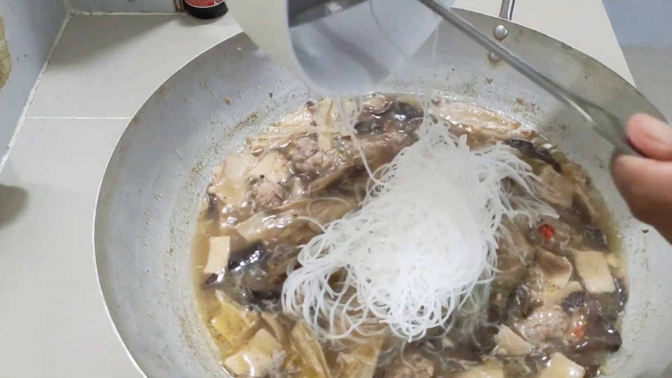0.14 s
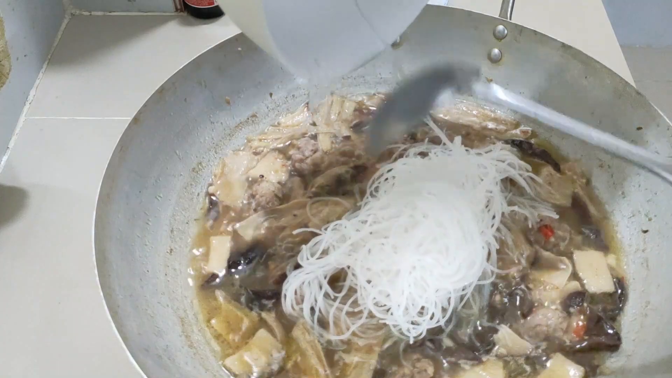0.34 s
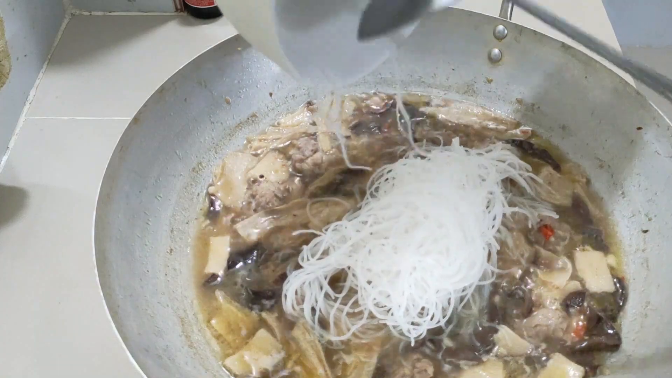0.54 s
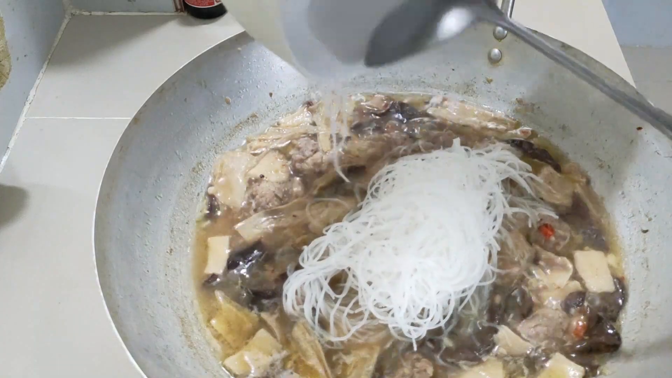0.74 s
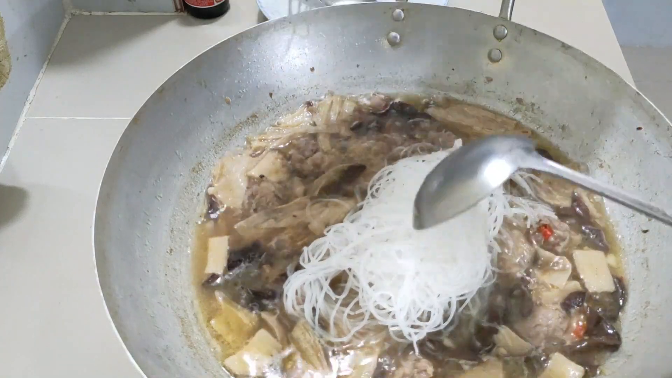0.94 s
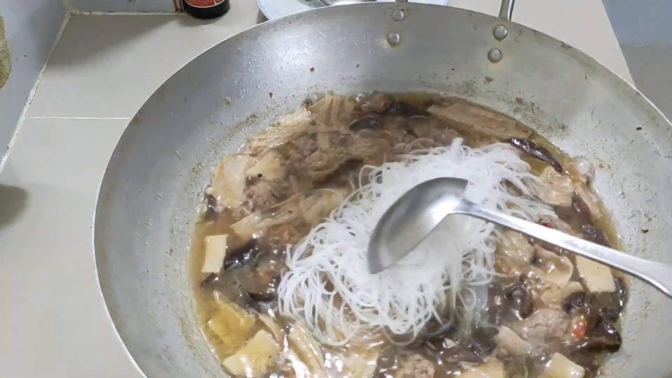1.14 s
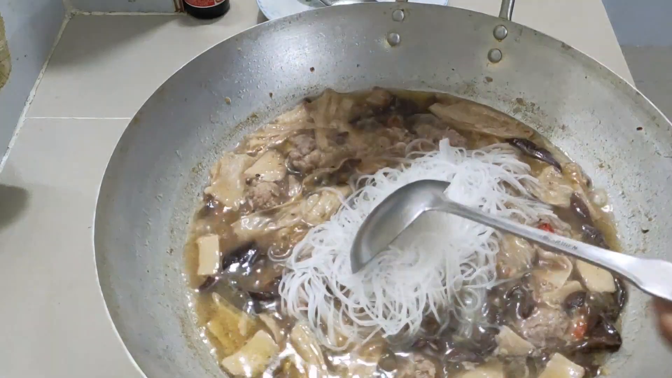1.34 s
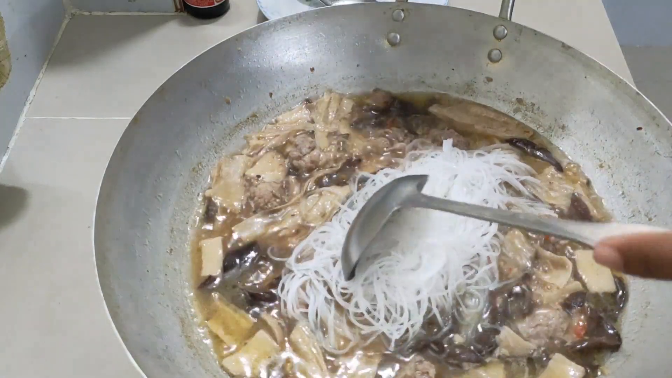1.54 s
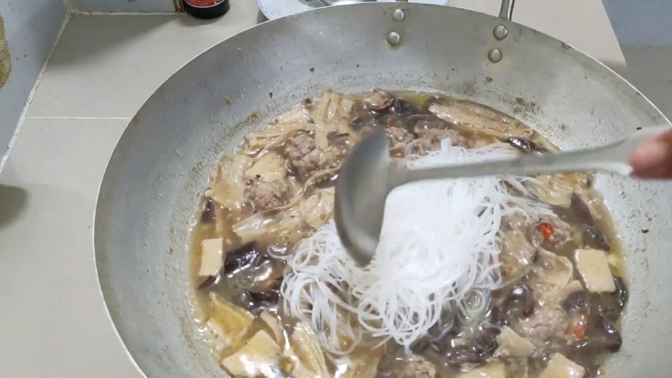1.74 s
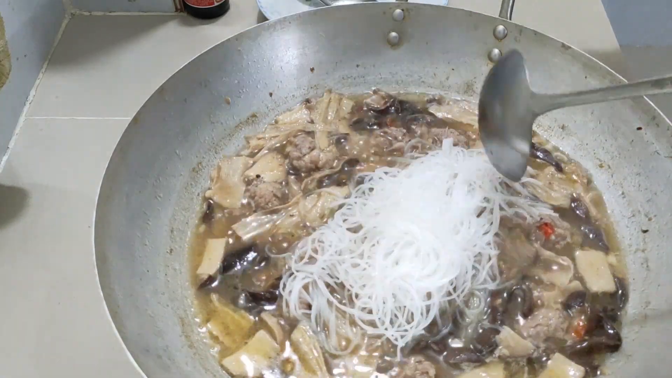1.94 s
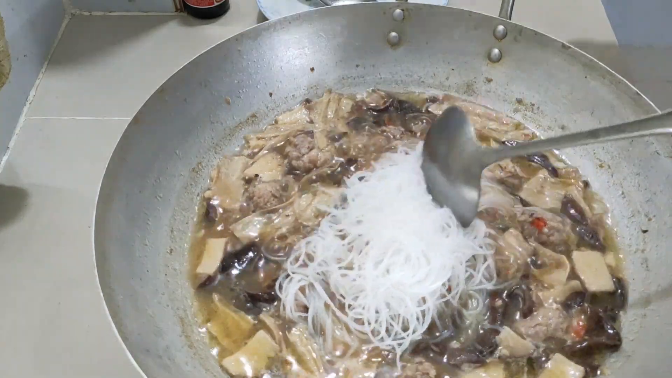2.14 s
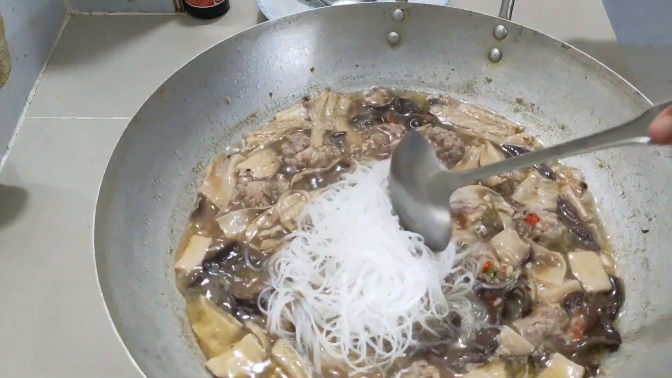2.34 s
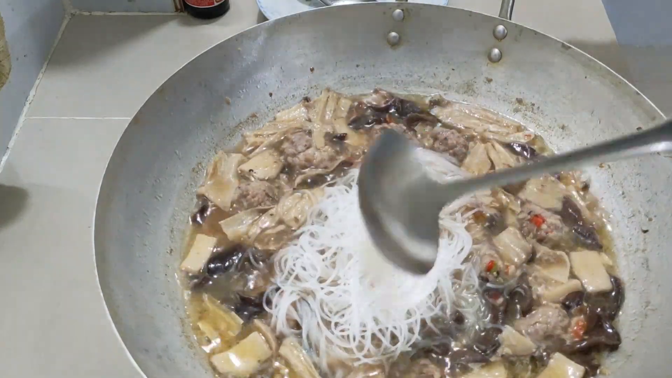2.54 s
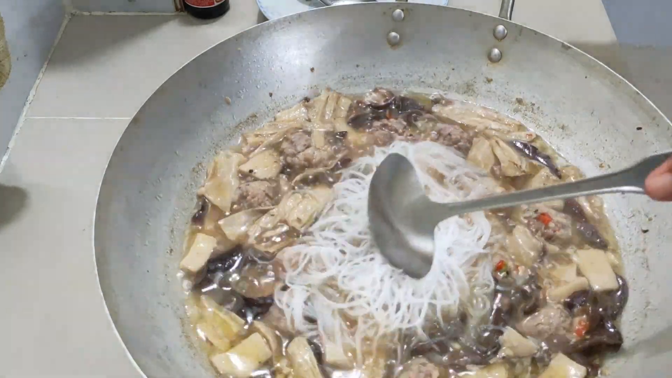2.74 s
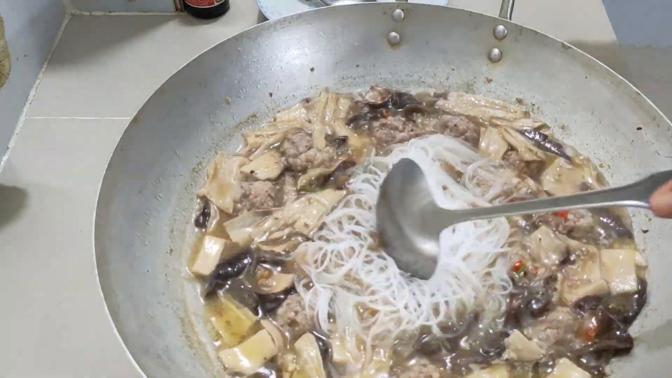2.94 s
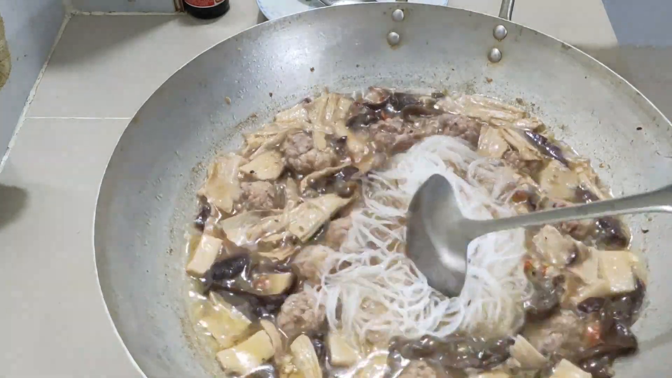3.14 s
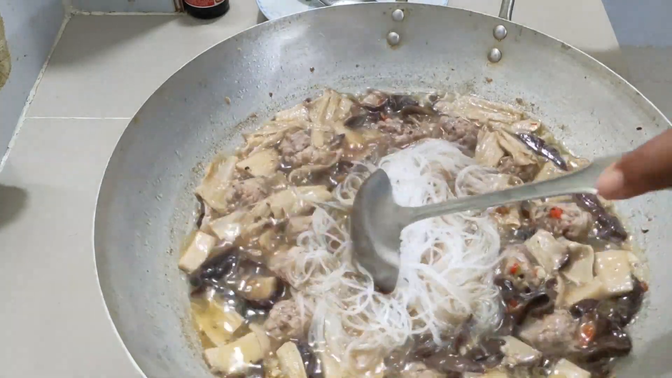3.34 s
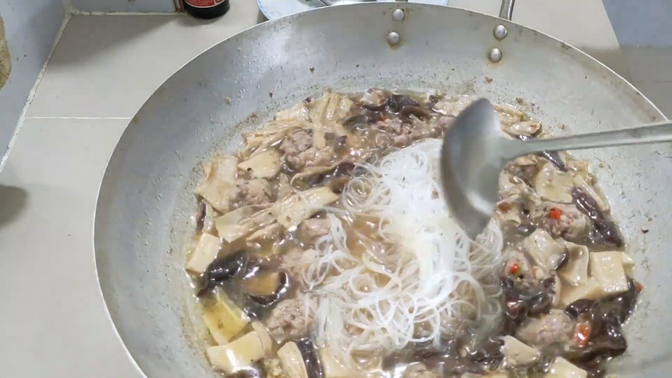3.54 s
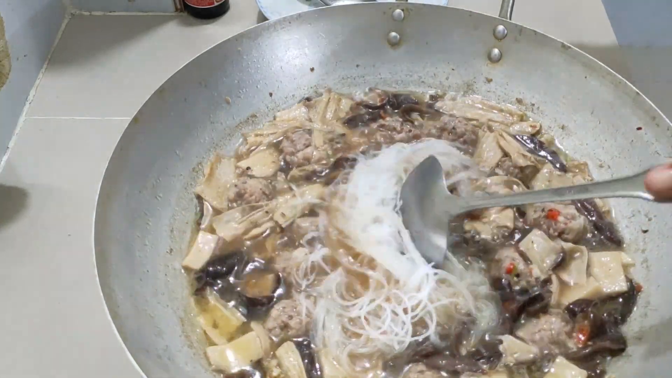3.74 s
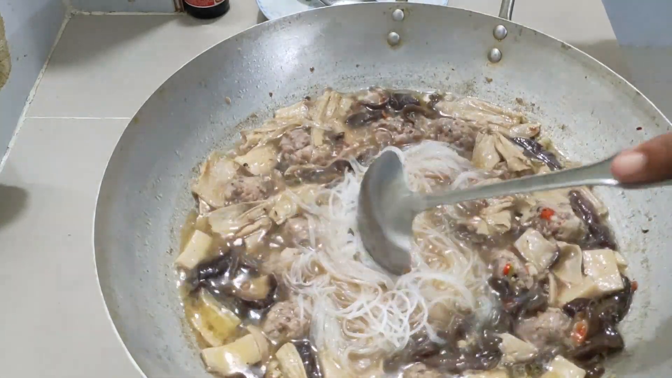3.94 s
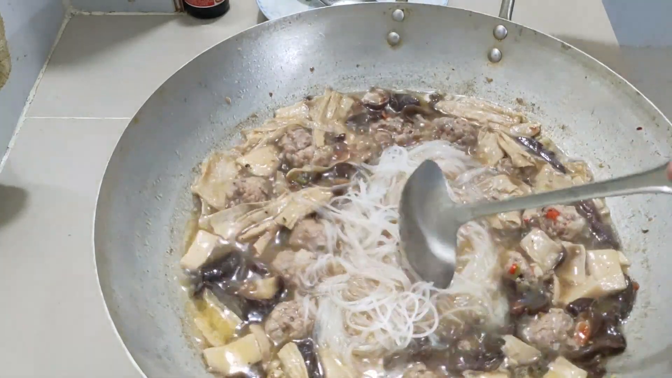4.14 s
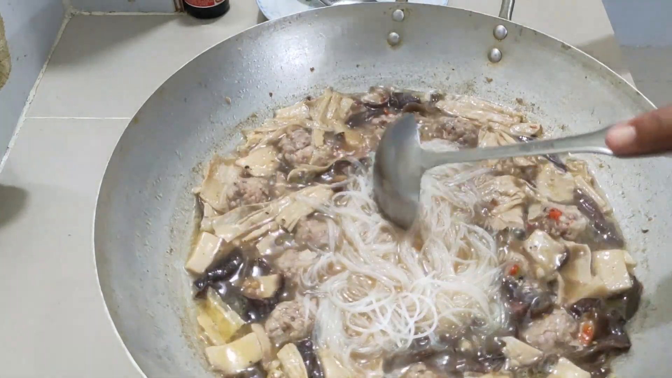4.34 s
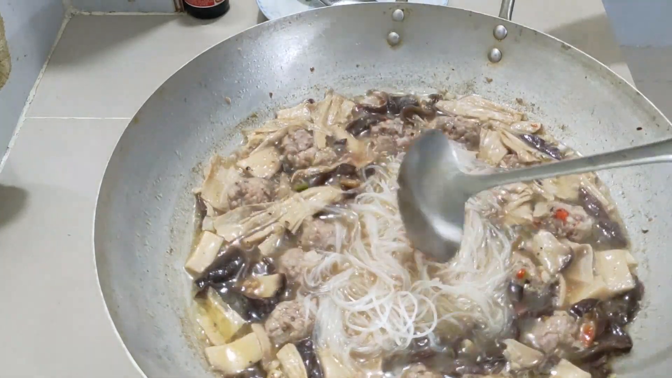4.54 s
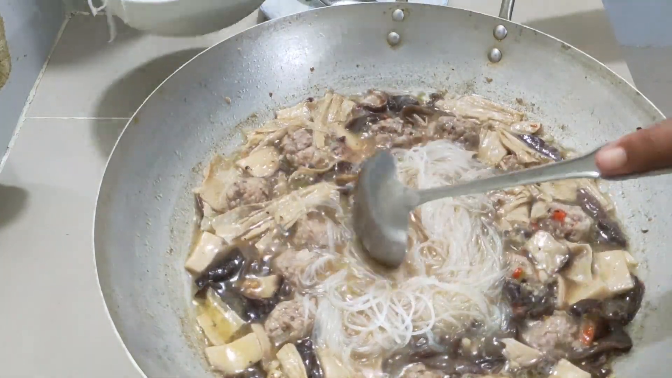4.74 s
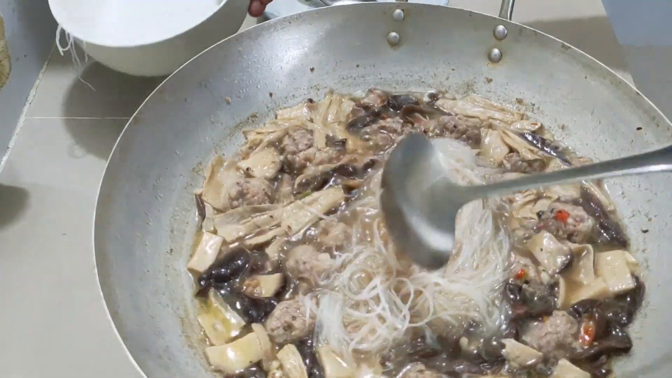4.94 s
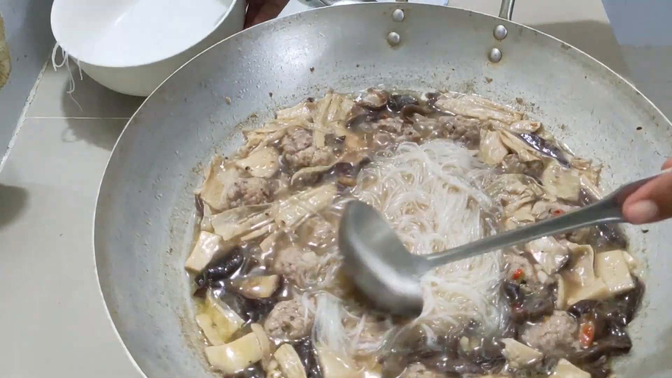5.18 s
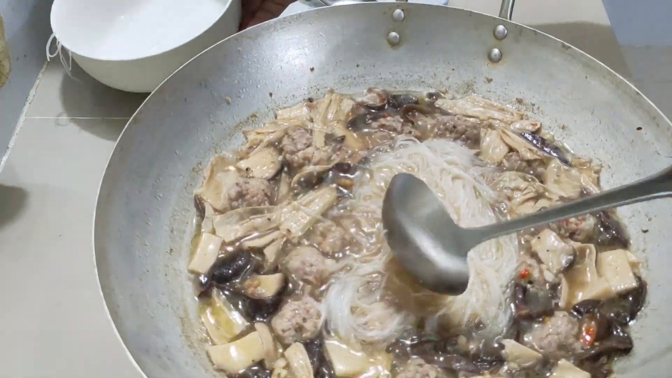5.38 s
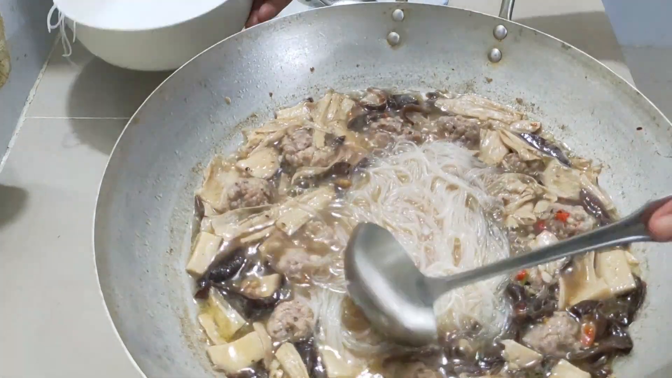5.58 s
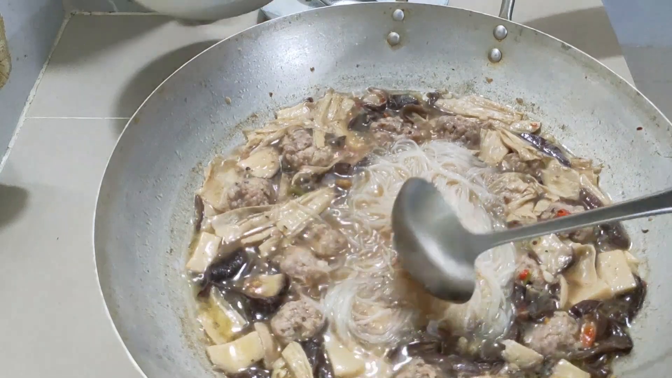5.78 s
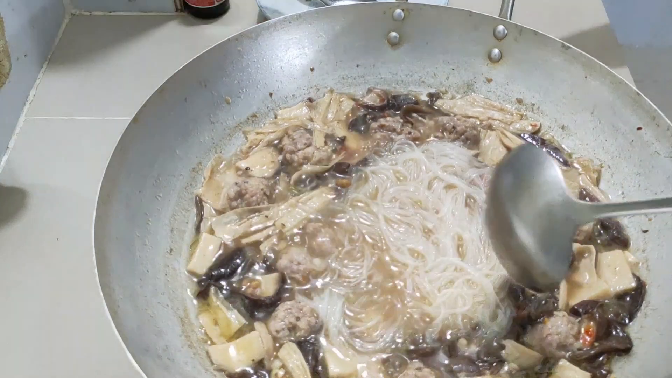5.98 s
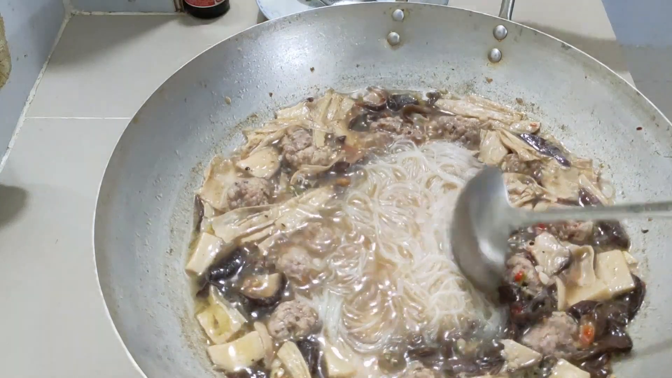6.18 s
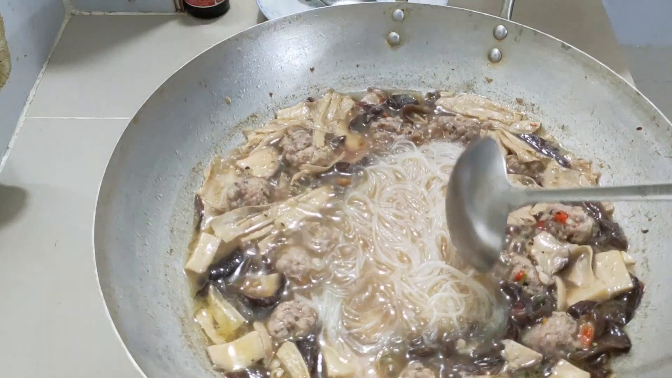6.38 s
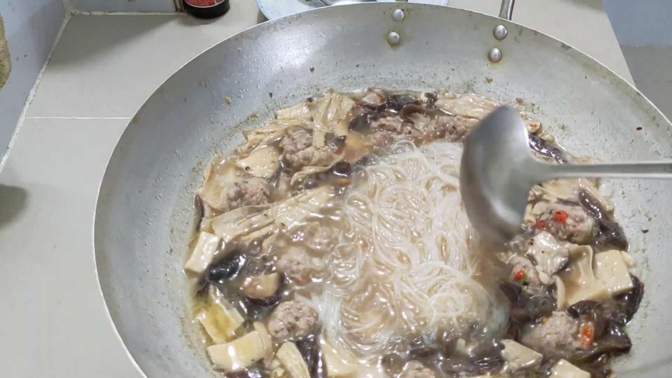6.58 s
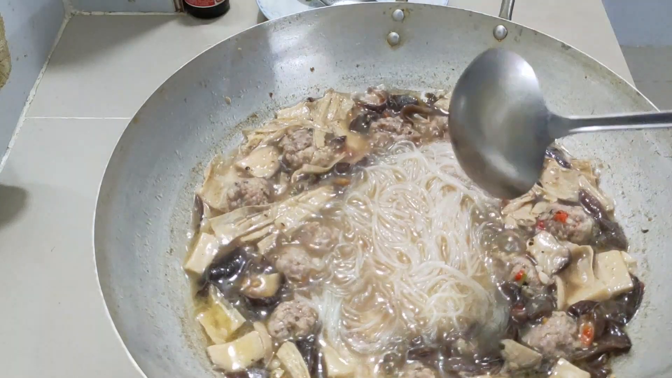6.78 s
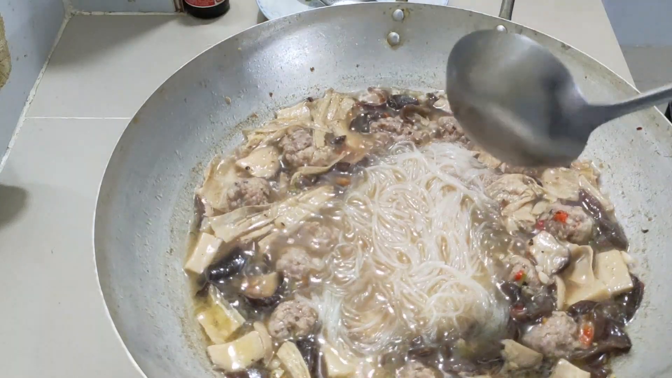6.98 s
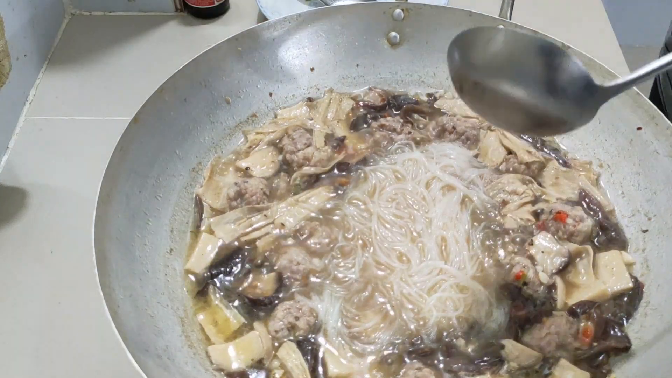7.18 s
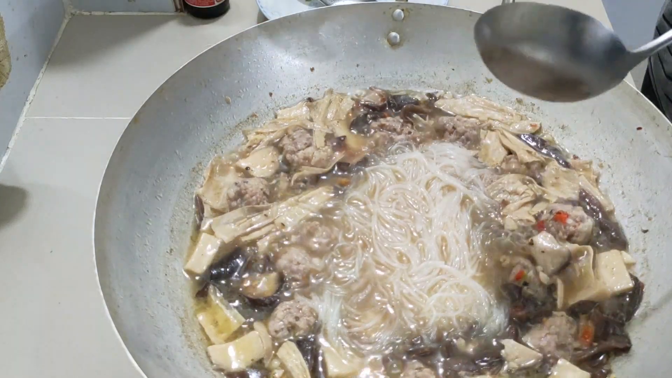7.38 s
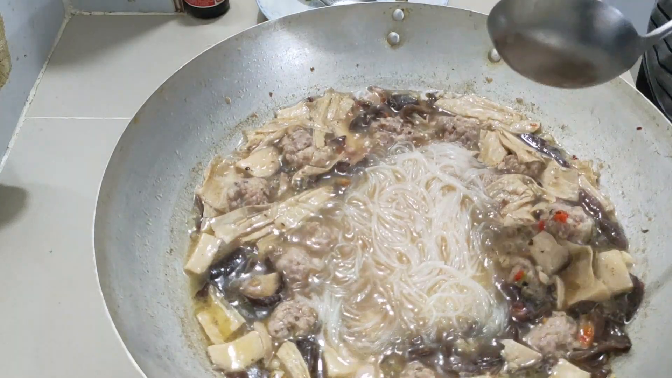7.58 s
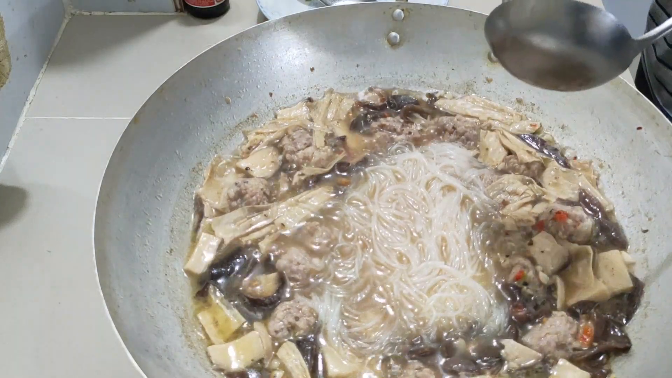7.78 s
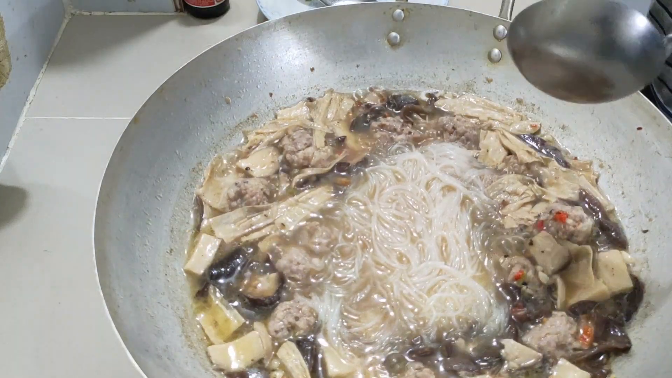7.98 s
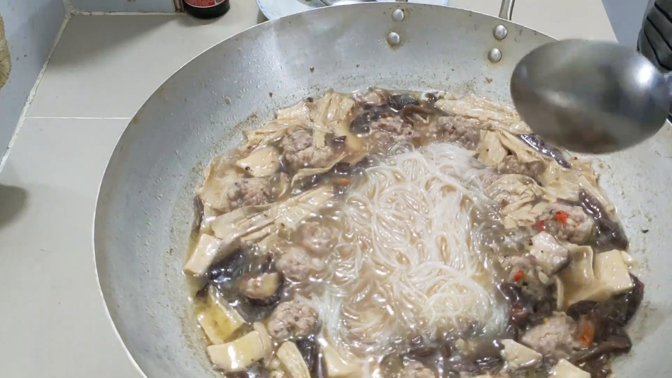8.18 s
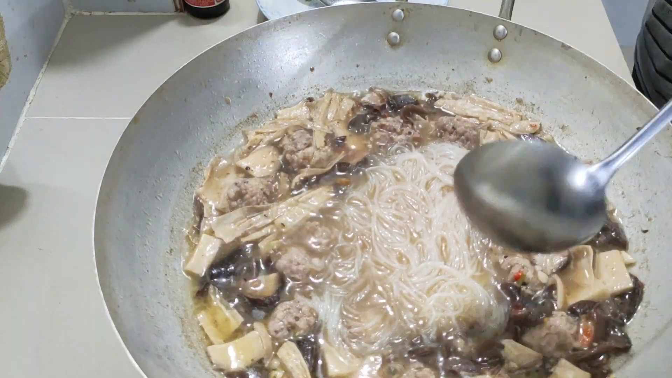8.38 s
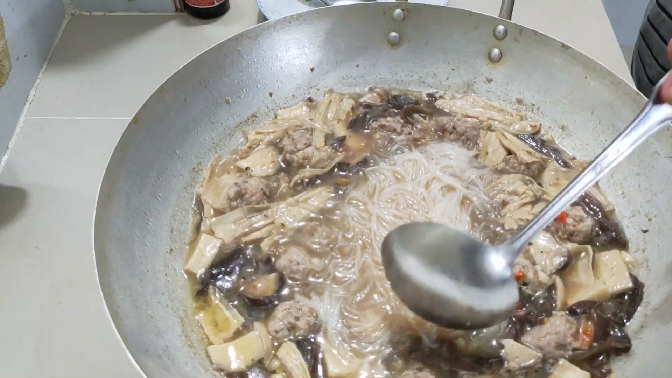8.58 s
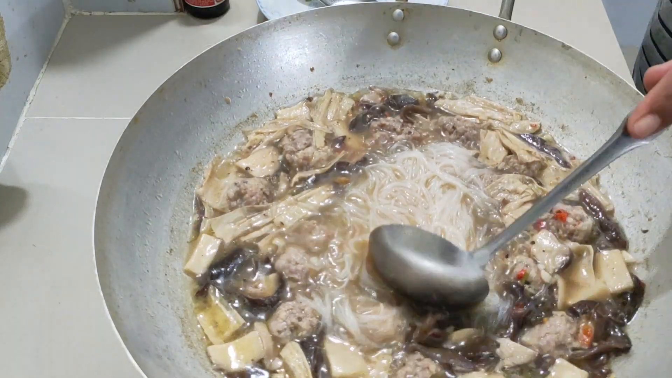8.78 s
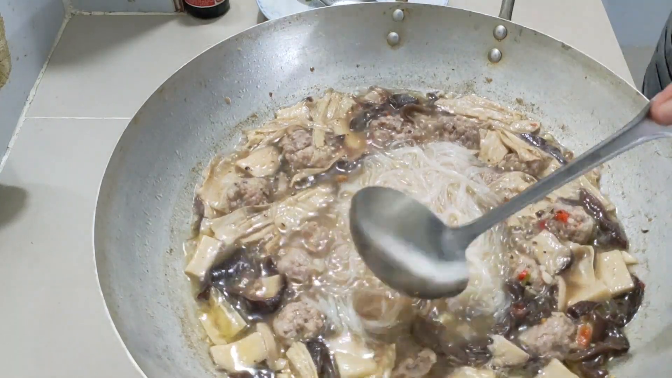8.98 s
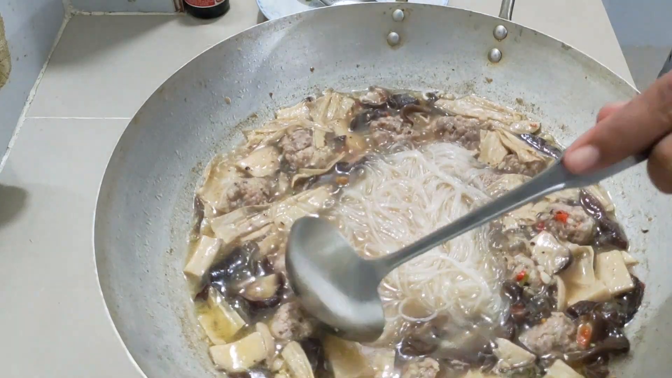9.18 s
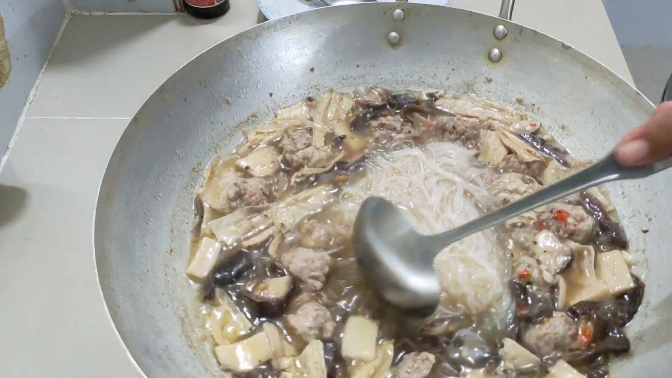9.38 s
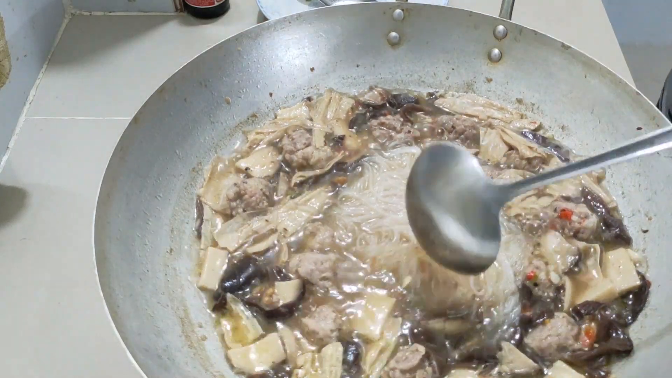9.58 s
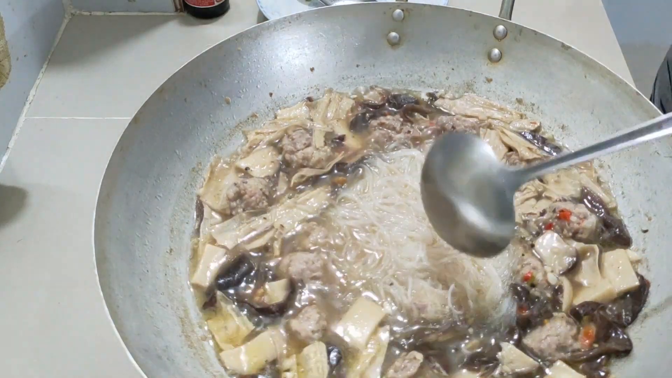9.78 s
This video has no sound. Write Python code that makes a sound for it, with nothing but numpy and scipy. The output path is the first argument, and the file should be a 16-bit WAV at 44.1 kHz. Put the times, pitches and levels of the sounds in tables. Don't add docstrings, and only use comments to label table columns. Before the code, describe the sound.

Soup bubbles and fizzes over a low burner hum, broken by one bright ladle clink early and loud crockery knocks near seven seconds.

```python
import sys
import numpy as np
from scipy import signal
from scipy.fft import rfft, irfft, next_fast_len
from scipy.io import wavfile
from scipy.ndimage import uniform_filter1d, minimum_filter1d, map_coordinates

SR = 44100
rng = np.random.default_rng(int(sys.argv[2]) if len(sys.argv) > 2 else 0)


def wrap_up_sound(samples):
    columns = np.atleast_2d(samples).T
    tamed = np.clip(columns, -1, 1)
    steps = np.round(tamed * 32767).astype(np.int16)
    wavfile.write(sys.argv[1], SR, steps)


def volts_from_decibels(level):
    exponent = np.asarray(level, float) / 20
    return 10 ** exponent


N = 433062


def unit(x):
    return x / np.sqrt(np.mean(np.abs(x) ** 2) + 1e-20)


def along(points, hz):
    point_hz, value = np.transpose(points)
    return np.interp(np.log(hz + 1), np.log(point_hz + 1), value)


def wobble(rate, size):
    knots = rng.standard_normal(int(size * rate / SR) + 4)
    return map_coordinates(knots, [np.arange(size) * rate / SR])


def filtered(x, response):
    size = next_fast_len(x.shape[-1] + 8192)
    spectrum = rfft(x, size) * response(np.fft.rfftfreq(size, 1 / SR))
    return irfft(spectrum, size)[..., :x.shape[-1]]


def resonances(peaks):
    def response(f):
        total = 0
        for k, (hz, width, db) in enumerate(peaks):
            total = total + (-1) ** k * volts_from_decibels(db) * 1j * f * width / (hz * hz - f * f + 1j * f * width)
        return total
    return response


# pitch_hz, likeness (1 = same)
LIKENESS = [(60, 1.0), (150, 1), (380, 0.83), (950, 0.56), (2380, 0.02), (5980, 0.013), (15000, 0.086)]


def spread(pair, colour):
    def mid_side(hz):
        turn = np.arccos(np.clip(along(LIKENESS, hz), -1, .985)) / 2
        return colour(hz) * [np.cos(turn), np.sin(turn)]
    mid, side = filtered(pair, mid_side)
    return unit(np.array([mid + side, mid - side]))


def rush(spectrum, patchy_db, tall=6, long=8):
    z = signal.stft(rng.standard_normal((2, N)), nperseg=512)[2]
    field = uniform_filter1d(rng.standard_normal(z.shape[1:]), tall, 0)
    field = uniform_filter1d(field, long, 1)
    pair = signal.istft(z * volts_from_decibels(patchy_db * unit(field)), nperseg=512)[1][:, :N]
    return spread(pair, lambda hz: volts_from_decibels(along(spectrum, hz)))


def grains(s, db, hz, cycles, rise, size):
    turns = hz[:, None] * np.arange(size) / SR
    life = turns / cycles
    wave = volts_from_decibels(db)[:, None] * np.exp(-life) * np.sin(2 * np.pi * turns * (1 + rise * life / 2))
    at = np.round(s * SR).astype(int)[:, None] + np.arange(size)
    return np.bincount(at.ravel(), wave.ravel(), N + size)[:N]


def swarm(count, low_hz, high_hz, spread_db, cycles, size):
    when, pitch, luck = rng.random((count, 3)).T
    hz = low_hz * (high_hz / low_hz) ** pitch
    db = -spread_db * np.log(np.maximum(luck, 1 / 40))
    return unit(grains(when * N / SR, db, hz, cycles, 0.17, size))


def played(s, db, rise_db, hold, fall_db):
    longest_s, silent_db = 0.544, -68
    length_s = min(hold + abs(db - silent_db) / fall_db, longest_s)
    t = np.arange(round(length_s * SR)) / SR
    level_db = db - rise_db * np.clip(1 - t / hold, 0, 1) - fall_db * np.clip(t - hold, 0, None)
    fade_in, fade_out = np.clip(t * 1000, 0, 1), np.clip((t[-1] - t) / 0.017, 0, 1)
    return round(s * SR), t, volts_from_decibels(level_db) * fade_out * fade_in


# pitch_hz, fade_db_per_s
PARTIAL_FADE = [(2000, -39), (6000, -2.5), (14000, -22)]


def chime(partials, t, scatter, rate):
    out = np.zeros((2, len(t)))
    for hz, db in partials:
        waver = [unit(1 + scatter * (wobble(rate, len(t)) + 1j * wobble(rate, len(t)))) for _ in "lr"]
        apart = min(hz / 6000, 1) * (rng.random((2, 1)) - .5)
        phase = 2 * np.pi * (hz * t + rng.random() + apart)
        out += volts_from_decibels(db + along(PARTIAL_FADE, hz) * t) * np.real(waver * np.exp(1j * phase))
    return unit(out)


# start_s, level_db, rise_db, hold_s, fall_db_per_s
RINGS = [
    (0, -62.5, -3, 0.0071, 65.5),
    (0.2147, -37, 2.5, 0.13, 116),
    (0.2148, -36, 5.5, 0.12, 117),
    (6.901, -30.5, 3.5, 0.1, 135),
    (6.9017, -33.5, 1.5, 0.087, 145.5),
    (7.3964, -28, 6, .07, 81),
    (7.402, -34.5, -2.5, 0.052, 51),
    (7.955, -62, -8.5, 0.025, 61),
]
# start_s, level_db, rise_db, hold_s, fall_db_per_s
BOWL_NOTE = [
    (0.218, -56.5, 4, 0.0099, 49),
    (4.953, -42, -1, 0.015, 330),
    (4.974, -49, 3, 0.063, 210),
]
# pitch_hz, level_db
FAINT_MODES = [(3902, -6), (4053, 0), (4175, 5)]
BOWL_MODES = [(2805, -63.5), (3360, -62.5), (3548, -65), (4031, -47), (4230, -62), (5491, -57), (5730, -58),
              (6650, -67), (6804, -61), (8415, -51.5), (9029, -55), (10734, -59), (11000, -71),
              (14449, -68)]
LADLE_MODES = [(2304, -55.5), (2327, -57), (4115, -47.5), (4650, -57.5), (6013, -47.5), (6412, -60),
               (8108, -51), (8327, -57), (8484, -64), (8662, -59), (9274, -53), (11773, -67), (13200, -68),
               (15122, -67)]
PLATE_MODES = [(1684, -49), (1717, -41), (2729, -58.5), (3122, -44.5), (3478, -51), (4657, -41.5),
               (4778, -48), (4807, -50), (6494, -38), (7814, -50.5), (7930, -46.5), (9390, -49),
               (9588, -50.5), (10643, -54)]
SPOON_MODES = [(2310, -43.5), (4123, -38.5), (4559, -60), (4608, -39.5), (4632, -42), (4730, -44),
               (6090, -51), (8620, -42), (9220, -56), (10239, -53), (11133, -55), (12177, -51),
               (13496, -54), (15009, -56)]
LANDING_MODES = [(1723, -49), (1900, -54), (1992, -54.5), (2654, -55), (3058, -50), (3348, -38),
                 (6100, -56), (6495, -56), (6910, -65), (7930, -60), (8650, -58), (9260, -64), (11763, -59),
                 (14847, -63)]
DISH_MODES = [(2245, -55.5), (2385, -46), (4100, -45), (4307, -57), (4565, -53), (4673, -53.5), (5550, -46),
              (5800, -55), (7370, -66), (8125, -46), (9030, -49), (10750, -69), (11100, -63), (13146, -65)]
SETTLING_MODES = [(3150, 0), (3400, 5), (3360, 6.5), (3650, -9.5), (2150, -4), (2500, -10)]
# waver_share, skirt_db, width_hz, left_minus_right_db
BLUR = [(0.87, 7, 110, 1), (0.57, 3.8, 80, -0.5), (0.37, 3.4, 114, 2.5), (0.49, 4.2, 92, 0.5),
        (0.33, 4.5, 120, 4), (0.19, 0, 73, -1), (0.44, 5, 70, 0.5), (1.1, 7.5, 140, -2)]
# start_s, swell_db
REBOUNDS = [
    (6.926, -1),
    (6.953, -1),
    (6.968, 1),
    (6.999, -9),
    (7.449, -3),
]
# start_s, change_db
DAMPED = [
    (7.004, -4),
    (7.479, -7),
    (7.575, -2.5),
]


def clinks():
    first_swings_db = [-16, 18.5, 22, 9.5, 1, 8, 3, -1]
    grip_s, rebound_s = 0.002, 0.0034
    skirt_fall, minor_hz, minor_db = 0.93, 34.97, 3.5
    out = np.zeros((2, N))
    struck = [FAINT_MODES, BOWL_MODES, LADLE_MODES, PLATE_MODES, SPOON_MODES, LANDING_MODES, DISH_MODES,
              SETTLING_MODES]
    for blow, partials, free_db, blur in zip(RINGS, struck, first_swings_db, BLUR):
        share, skirt_db, width, lean_db = blur
        at, t, gain = played(*blow)
        again = 0
        for s, db in REBOUNDS:
            since = t + blow[0] - s
            again = again + volts_from_decibels(db) * np.clip(since / 0.0051, 0, 1) * np.exp(-np.abs(since) / rebound_s)
        gain = gain * (1 + volts_from_decibels(free_db) * np.exp(-(t / grip_s) ** 2) + again)
        gain = gain * volts_from_decibels([[lean_db / 2], [-lean_db / 2]])
        muted_db = sum(db * np.clip((t + blow[0] - s) / 0.0029, 0, 1) for s, db in DAMPED if s > blow[0])
        gain = gain * volts_from_decibels(muted_db)
        ripple = rng.standard_normal(2000)

        def minor_modes(f):
            skirts = sum(volts_from_decibels(db) / (1 + ((f - hz) / width) ** 2) ** skirt_fall for hz, db in partials)
            return skirts * volts_from_decibels(minor_db * map_coordinates(ripple, [f / minor_hz]))

        smear = filtered(rng.standard_normal((2, len(t))), minor_modes)
        ring = chime(partials, t, scatter=share, rate=26.8)
        out[:, at:at + len(t)] += gain * (ring + volts_from_decibels(skirt_db) * unit(smear))
    for blow in BOWL_NOTE:
        at, t, gain = played(*blow)
        out[:, at:at + len(t)] += gain * chime([(934, 0)], t, scatter=0.17, rate=2.8)
    return out


# start_s, peak_db, centre_hz, length_s
CRACKS = [(0.2105, -25, 8500, 0.006), (0.2123, -20, 6500, 0.0033), (0.2142, -15, 6500, 0.0027),
          (4.954, -40, 620, 0.0067), (6.904, -13.5, 3000, 0.006), (6.9267, -24, 4500, .004),
          (7.3915, -30, 1500, .01), (7.3945, -22, 1490, 0.0048), (7.406, -14, 3800, 0.0054),
          (6.913, -41, 3000, 0.023), (7.944, -48, 2000, 0.018), (7.954, -29, 3300, 0.015),
          (7.446, -22, 1480, 0.0047), (7.949, -39, 1400, 0.011)]
# start_s, peak_db, pitch_hz
PINGS = [
    (0.2145, -13, 4200),
    (0.2148, -11.5, 6100),
    (0.2150, -11, 8900),
    (0.2149, -26, 2900),
    (0.2167, -15, 7200),
]
# start_s, peak_db, pitch_hz
THUDS = [
    (0.212, -35, 900),
    (7.395, -8.5, 915),
    (7.3988, -11, 1100),
    (7.955, -25.5, 1060),
    (7.9611, -29, 1200),
]


def cracks():
    out, t = np.zeros(N), np.arange(SR // 20) / SR
    for s, db, hz, length in CRACKS:
        colour = resonances([(hz, 1.3 * hz, 0)])
        burst = unit(filtered(rng.standard_normal(len(t)), lambda f: colour(f) ** 2))
        burst = volts_from_decibels(db - 10.5 - 20 * t / length) * burst * np.clip(t / 0.0002, 0, 1)
        out[round(s * SR):][:len(t)] += burst
    pings = grains(*np.transpose(PINGS), cycles=6.5, rise=0.01, size=800)
    floor_hz = 2000
    out += filtered(pings, lambda f: (1j * f / (floor_hz + 1j * f)) ** 2)
    return out + grains(*np.transpose(THUDS), cycles=0.77, rise=0.16, size=400)


# start_s, level_db, rise_db, hold_s, fall_db_per_s
CLATTER = [
    (0.212, -51, 6, 0.1, 63),
    (6.208, -48.5, 9, 0.13, 117.5),
    (6.901, -34, -7.5, 0.058, 98),
    (7.184, -40, 7, 0.054, 115.5),
    (7.393, -27.5, -3, 0.073, 84),
    (7.571, -37, 5, 0.023, 199),
    (7.681, -36, 1.5, 0.029, 168),
    (7.95, -40.5, -7, 0.03, 124.5),
]
# pitch_hz, width_hz, level_db
BODIES = [
    [(1680, 690, 12)],
    [(198, 71, -1), (413, 310, -8), (820, 560, -2.5)],
    [(505, 170, -3), (860, 110, 5), (1090, 65, 0.5), (1770, 9.2, -20)],
    [(477, 70, 13.5), (846, 58, 12)],
    [(288, 9.6, -3.5), (800, 15, 4), (1060, 22, 4.5), (1244, 24, -5), (1770, 25, -30)],
    [(500, 50, 19), (620, 82, 18)],
    [(500, 290, -6), (835, 50, 9.5), (1200, 18, 3), (1790, 99, -31)],
    [(308, 15, 1.5), (521, 21, 7), (740, 40, 2), (1006, 56, 6), (1210, 64, -9), (1600, 520, -22)],
]


def clatter():
    counter = (854, 910, -4)
    out = np.zeros((2, N))
    for burst, body in zip(CLATTER, BODIES):
        at, t, gain = played(*burst)
        rattle = rng.standard_normal((2, len(t))) * volts_from_decibels(0.81 * wobble(89.0, len(t)))
        modes = resonances([*body, counter])
        out[:, at:at + len(t)] += gain * spread(rattle, lambda f: modes(f) / (1 + (f / 2000) ** 6))
    return out


# time_s, level_db
SIMMER = [(0, 2), (.3, 0.5), (.65, 0.5), (1.66, 2.5), (2.07, 0), (2.51, 2), (3.1, 0), (3.6, 1), (5.8, 1),
          (6.1, 1), (6.38, 5.5), (6.7, 1.5), (8.1, 4), (8.3, 1), (9.2, 0.5), (9.82, 0.5)]
# pitch_hz, level_db_per_hz
GURGLE = [(120, -4), (200, -9), (573, -10), (1680, -14), (3310, -15.5), (4000, -14.5), (5200, -19),
          (8800, -120)]
FIZZ = [(1470, -36), (2500, -17), (4850, -8.5), (8380, 1.5), (9770, 0.5), (12800, -6.5), (15200, -0.5),
        (15800, -8)]
# start_s, peak_db, pitch_hz
PLOPS = [(0.173, -33, 990), (0.625, -44, 710), (0.743, -36.5, 1390), (0.842, -36, 1410),
         (1.101, -41.5, 1180), (1.145, -44, 630), (1.322, -44, 950), (1.346, -34.5, 1340),
         (1.48, -40.5, 970), (1.639, -36, 1260), (1.799, -40, 910), (1.844, -41, 1030), (2.138, -39, 840),
         (2.277, -35.5, 970), (2.543, -37, 1600), (2.718, -39.5, 1380), (2.816, -40.5, 1110),
         (2.905, -42, 1090), (3.569, -34, 1350), (3.658, -39, 1600), (4.023, -33, 1600), (4.064, -44, 920),
         (4.341, -41.5, 710), (4.769, -43, 630), (5.199, -44, 1330), (5.737, -40, 900),
         (6.014, -40.5, 1310), (9.044, -37.5, 1200), (9.164, -45, 536), (9.198, -35.5, 996),
         (2.278, -33.5, 1690), (2.8436, -39, 1370), (2.931, -36, 1740), (3.2877, -30.5, 3400),
            (3.344, -44, 1420), (4.085, -35.5, 2340), (4.878, -42.5, 1720), (5.272, -39, 2660),
            (5.2897, -42, 1760), (5.311, -37, 2400), (5.3537, -37, 2150), (5.822, -38, 1680),
            (8.791, -42.5, 1430), (9.179, -37.5, 1670), (9.2044, -55, 1620), (9.217, -32, 1860),
            (9.484, -39, 1880)]
LESSER_PLOPS = [(0.681, -42.5, 896), (0.743, -47, 1450), (0.849, -34, 1380), (0.953, -54, 646),
                (1.232, -43, 616), (1.282, -43, 1560), (1.549, -45, 600), (1.931, -42, 855),
                (2.048, -44, 845), (2.623, -48, 834), (3.329, -38, 1210), (3.734, -42, 1850),
                (3.813, -43, 993), (3.877, -42, 743), (3.972, -43.5, 713), (4.109, -46, 729),
                (4.228, -40, 1940), (4.365, -36.5, 2010), (4.495, -38.5, 1630), (4.554, -44, 633),
                (4.618, -44, 651), (5.104, -51, 654), (5.304, -42, 904), (5.342, -46, 700),
                (5.407, -48, 600), (5.43, -42, 778), (5.46, -49, 646), (5.805, -42, 1050),
                (5.889, -57, 692), (6.094, -46, 727), (6.158, -39, 918), (6.241, -40, 740),
                (6.547, -56, 600), (6.714, -55, 600), (6.802, -39.5, 894), (8.438, -43, 767),
                (8.615, -46, 600), (8.71, -40.5, 756), (8.865, -53, 610), (8.89, -42.5, 641),
                (9.074, -40, 694)]
# start_s, peak_db, pitch_hz
SNAPS = [(1.1383, -39, 5870), (1.284, -46, 4200), (1.4631, -47, 5450), (2.132, -52, 2580),
         (2.2278, -49, 5600), (2.7157, -31.5, 5830), (3.0644, -49, 5130), (3.0998, -45, 5700),
         (3.9559, -34, 6000), (4.0527, -47, 5860), (4.0896, -45, 2850), (4.5103, -45, 5160),
         (5.3497, -45, 5820), (5.4157, -41, 5250), (5.513, -53, 5960), (5.809, -35, 5570),
         (6.8027, -38, 2770), (7.1644, -31, 4640), (8.1994, -56, 5550), (8.3267, -45, 5370),
         (8.395, -49, 2680), (8.4263, -41.5, 2740), (8.6827, -48, 3530), (9.0244, -43, 5710),
         (9.3134, -54, 5540)]
SPITS = [(0.9742, -45, 6560), (1.194, -48, 9800), (1.548, -42, 7400), (1.903, -40, 8640),
         (2.206, -46, 9500), (2.3788, -45, 8000), (2.714, -45.5, 7900), (3.065, -43.5, 7700),
         (3.101, -41.5, 7900), (3.5894, -39.5, 8950), (3.745, -45, 7900), (3.9564, -39.5, 7900),
         (4.0542, -39.5, 9400), (4.688, -40.5, 7700), (4.7918, -41.5, 7600), (5.137, -44.5, 10000),
         (5.351, -41, 11000), (5.956, -43, 8100), (6.007, -49, 8440), (6.3204, -36.5, 8000),
         (7.093, -38, 8400), (7.16, -40, 8800), (7.173, -38.5, 9000), (8.0537, -38.5, 9250),
         (8.1994, -46, 8800), (8.238, -42, 8250), (8.372, -43, 9000), (8.683, -39, 8100),
         (9.314, -44, 8900), (9.484, -48, 11000), (9.218, -51, 12100), (9.3554, -48, 9250),
         (9.719, -45, 9140), (9.7579, -38.5, 8600)]


def soup():
    time_s, level_db = np.transpose(SIMMER)
    heat_db = np.interp(np.arange(N) / SR, time_s, level_db)
    boil = wobble(14, N)
    gurgle_db = -56.5 + heat_db + 0.67 * boil
    fizz_db = -53 + 0.85 * heat_db + 0.041 * boil + 1.08 * wobble(30, N)

    bubbles = np.array([swarm(count=900, low_hz=364.0, high_hz=3006, spread_db=-0.5, cycles=2.5, size=500)
                        for _ in "ab"])
    gurgle = rush(GURGLE, patchy_db=2.5) + volts_from_decibels(-10.5) * spread(bubbles, lambda hz: 1)
    crackle = np.array([swarm(count=7000, low_hz=3660, high_hz=13500, spread_db=-0.5, cycles=0.93, size=64)
                        for _ in "ab"])
    fizz = rush(FIZZ, patchy_db=2.7, tall=20, long=2)
    fizz = fizz + volts_from_decibels(-1.5) * spread(crackle, lambda hz: volts_from_decibels(along(FIZZ, hz)))
    bed = volts_from_decibels(gurgle_db) * gurgle + volts_from_decibels(fizz_db) * fizz

    pops = volts_from_decibels(4.5) * grains(*np.transpose(PLOPS), cycles=0.65, rise=0.088, size=700)
    pops += volts_from_decibels(2.5) * grains(*np.transpose(LESSER_PLOPS), cycles=0.66, rise=0.078, size=700)
    pops += volts_from_decibels(5) * grains(*np.transpose(SNAPS), cycles=1.0, rise=0.037, size=200)
    spits = grains(*np.transpose(SPITS), cycles=2.24, rise=0.003, size=200)
    sputter = rng.standard_normal(300) * volts_from_decibels(-60 * np.arange(300) / SR / 0.0056)
    return bed, pops + volts_from_decibels(1.0) * np.convolve(spits, sputter)[:N]


# delay_s, level_db
WOK_ECHOES = [(.0012, -22.5), (.0027, -14.5), (.005, -7.5), (.0083, -8)]


def wok(x):
    skew = np.array([[1.06], [.94]])

    def echoes(f):
        return 1 + sum(volts_from_decibels(db) * np.exp(-2j * np.pi * f * s * skew) for s, db in WOK_ECHOES)
    return filtered(x, echoes)


def surging(rest_db, surges):
    edge_s = 0.026
    t, gain = np.arange(N) / SR, volts_from_decibels(rest_db + 1.34 * wobble(6.9, N))
    for s, length, db in surges:
        u = np.clip((t - s + edge_s) / (length + 2 * edge_s), 0, 1)
        gain = gain + volts_from_decibels(db) * np.sin(np.pi * u) ** 2
    return gain


# pitch_hz, level_db_per_hz
RUMBLE = [(12, -12), (20, -13), (48, 3.5), (80, -3.5), (159, -3), (216, -22), (300, -19.5), (660, -120)]
# pitch_hz, width_hz
HOLLOWS = [(103, 9.3), (136, 18.4)]
# start_s, length_s, level_db
LOW_SURGES = [(0.641, 0.03, -62), (1.325, 0.031, -49), (1.521, 0.03, -61), (2.116, 0.38, -46),
              (2.6, 0.037, -57), (2.665, 0.086, -55), (3.152, 0.063, -51), (3.25, 0.16, -52),
              (3.648, 0.045, -53), (3.74, 0.047, -59), (5.012, 0.042, -55), (5.629, 0.054, -59),
              (6.34, 0.079, -52), (6.447, 0.037, -57), (7.27, 0.045, -61), (8.066, 0.077, -63),
              (8.948, 0.29, -52), (9.544, 0.22, -55)]
HIGH_SURGES = [(0.336, 0.047, -58), (1.039, 0.061, -50), (1.164, 0.078, -48.5), (1.302, 0.047, -48),
               (1.408, 0.039, -52), (1.593, 0.073, -52), (1.893, 0.14, -51), (2.084, 0.1, -46.5),
               (2.384, 0.06, -48.5), (3.21, 0.037, -55), (3.483, 0.052, -49), (3.754, 0.062, -50),
               (3.854, 0.034, -56), (4.313, 0.069, -52), (4.575, 0.056, -47.5), (5.397, 0.032, -50.5),
               (5.522, 0.075, -47), (5.654, 0.076, -47), (5.936, 0.046, -47), (6.432, 0.13, -48.5),
               (6.752, 0.086, -48),
               (7.967, 0.05, -53),
    (8.119, 0.05, -47.5),
    (8.663, 0.059, -52),
    (8.935, 0.055, -46),
    (9.076, 0.069, -57),
]


def burner():
    out = volts_from_decibels(-55.0) * rush(RUMBLE, patchy_db=0.5)
    gains = [surging(-61, LOW_SURGES), surging(-59, HIGH_SURGES)]
    at, t, boom = played(7.396, db=-37.5, rise_db=-4.5, hold=-0.04, fall_db=41)
    gains[1][at:at + len(t)] += boom
    for (hz, width), gain in zip(HOLLOWS, gains):
        hollow = resonances([(hz, width, 0)])
        band = spread(rng.standard_normal((2, N)), lambda f: hollow(f) ** 2)
        swell = np.sqrt(np.abs(uniform_filter1d(band[0] ** 2, size=3000)) + 1e-12)
        out += gain * unit(band / swell)
    return out


# pitch_hz, t60_s
KITCHEN = [(300, 0.17), (3000, 0.54), (12000, 0.077)]


def kitchen(x):
    hz, t, z = signal.stft(rng.standard_normal((2, SR // 2)), SR, nperseg=256)
    decay = volts_from_decibels(-60 * t / along(KITCHEN, hz)[:, None])
    tail = signal.istft(z * decay, SR, nperseg=256)[1]
    delayed = np.pad(x, (200, 0))[None]
    return signal.fftconvolve(delayed, tail / np.linalg.norm(tail[0]), axes=1)[:, :N]


# start_s, depth_db, hold_s, recovery_s
DUCKS = [
    (.217, -13, .09, .03),
    (6.902, -6, .09, .08),
    (7.394, -6, .08, .08),
]


def ducking():
    t, db = np.arange(N) / SR, 0
    for s, depth_db, hold, recovery in DUCKS:
        db = db + depth_db * (t > s) * np.exp(-np.clip(t - s - hold, 0, None) / recovery)
    return volts_from_decibels(db)


# pitch_hz, margin_db
THIN = [(900, -40), (1600, -9), (2500, -4), (4500, -1), (6500, -3.5), (9000, -4), (12500, -2), (15000, -5)]
# pitch_hz, margin_db
ROUNDED = [(1000, -14.5), (2500, -7.5), (5000, -2.5), (8500, -3.5), (12500, -1), (15000, -0.5)]


def thinned(x):
    hz, _, z = signal.stft(x, SR, nperseg=1280)
    power = uniform_filter1d(np.abs(z.sum(0)) ** 2, size=3, axis=1, origin=-1)
    power = uniform_filter1d(power, size=5, axis=0)
    near_db = 10 * np.log10(np.abs(power) + 1e-30)
    luck = uniform_filter1d(rng.standard_normal(z.shape[1:]), size=8, axis=0)
    luck = uniform_filter1d(luck, size=2, axis=1)
    margin_db = near_db - uniform_filter1d(near_db, size=41, axis=0) + 2.8 * unit(luck)
    lost = minimum_filter1d(margin_db, size=3, axis=1) < along(THIN, hz)[:, None]
    around = uniform_filter1d(np.abs(z) ** 2, size=9, axis=1)
    around = uniform_filter1d(around, size=3, axis=2)
    lost = lost | (np.abs(z) ** 2 < around * volts_from_decibels(2 * along(ROUNDED, hz))[:, None])
    loud_db = 10 * np.log10(np.abs(z[0, 60:]) ** 2 + 1e-30).mean(0)
    lost &= np.diff(loud_db, prepend=loud_db[0]) < 5
    return signal.istft(z * np.where(lost, volts_from_decibels(-40), 1), SR, nperseg=1280)[1][:, :N]


def scene():
    bed, pops = soup()
    contacts = cracks()
    simmer = bed + wok(pops) + volts_from_decibels(-7.5) * kitchen(pops)
    blows = clinks() + clatter() + contacts + volts_from_decibels(-13) * kitchen(contacts)
    return burner() + ducking() * simmer + volts_from_decibels([[-.7], [.7]]) * blows


# pitch_hz, left_minus_right_db
LEAN = [(180, 0), (550, -.5), (1650, -1), (5000, -2.5), (15000, -3.5)]


def roll_off(x):
    return signal.sosfilt(signal.butter(12, 15870, fs=SR, output="sos"), x)


def record(dry):
    def balance(hz):
        return volts_from_decibels(np.outer([.5, -.5], along(LEAN, hz))) * (hz < 15870)
    ports = filtered(dry, balance)
    ports = ports / (1 + np.abs(ports / .8) ** 4) ** (1 / 4)
    mix = thinned(ports) + 0.0029
    return roll_off(mix)


dry = scene()
out = record(dry)
wrap_up_sound(out)
```